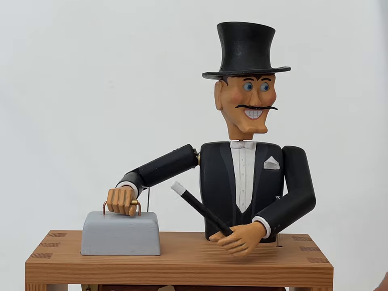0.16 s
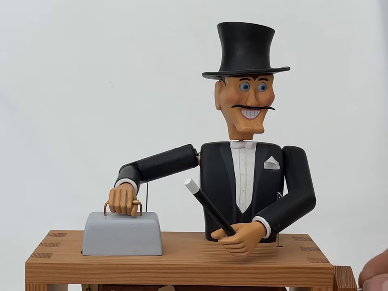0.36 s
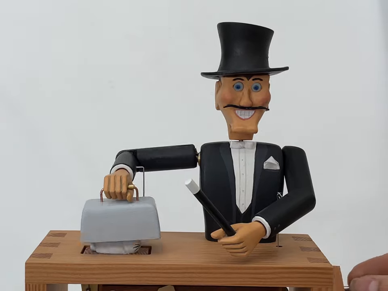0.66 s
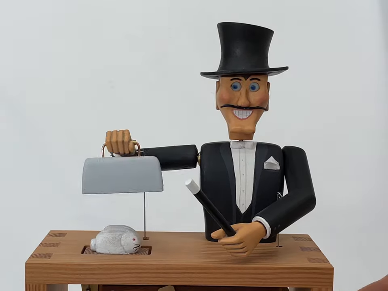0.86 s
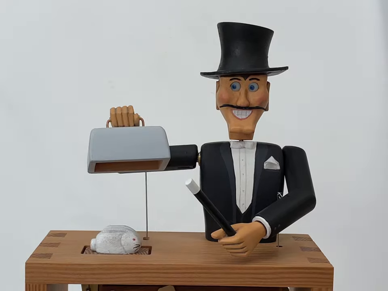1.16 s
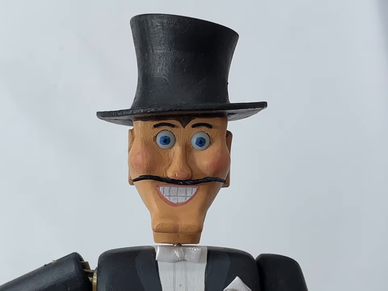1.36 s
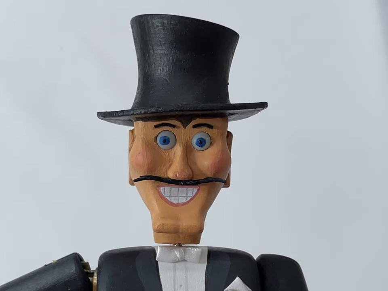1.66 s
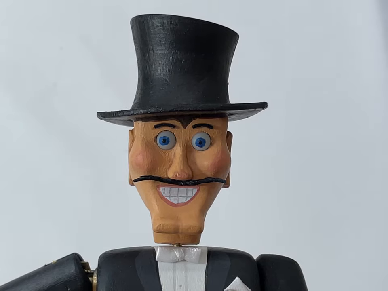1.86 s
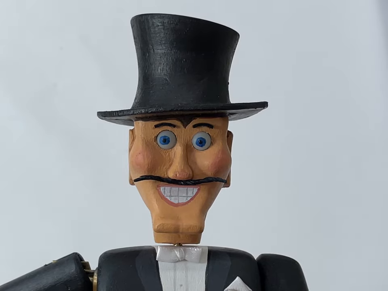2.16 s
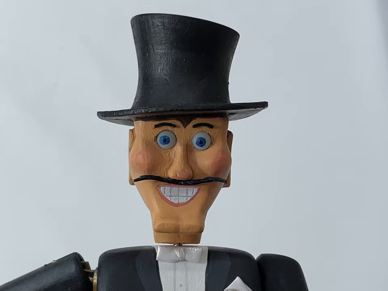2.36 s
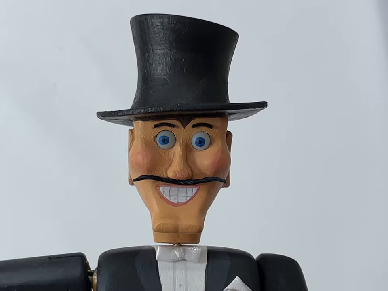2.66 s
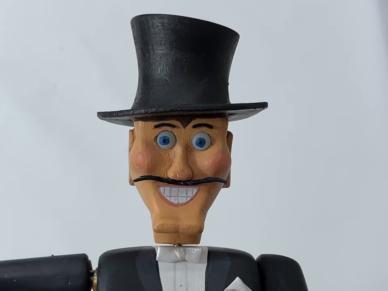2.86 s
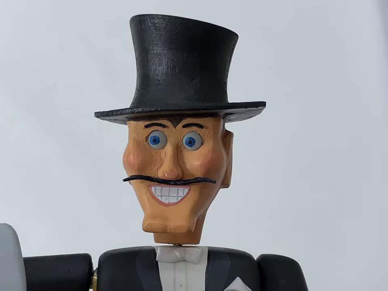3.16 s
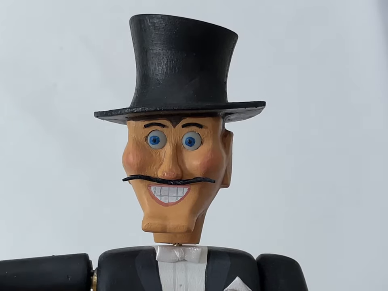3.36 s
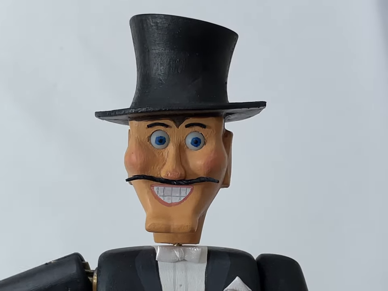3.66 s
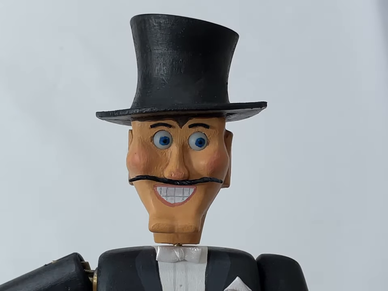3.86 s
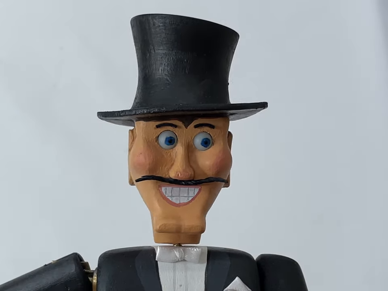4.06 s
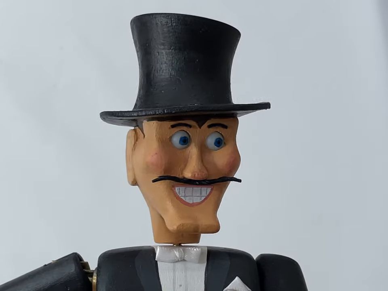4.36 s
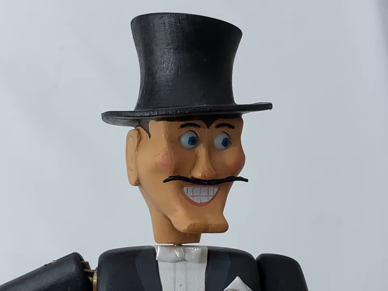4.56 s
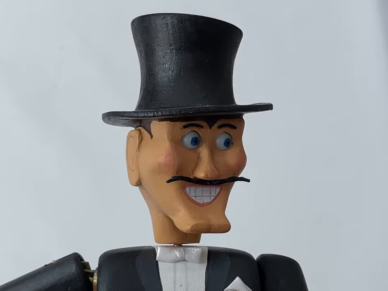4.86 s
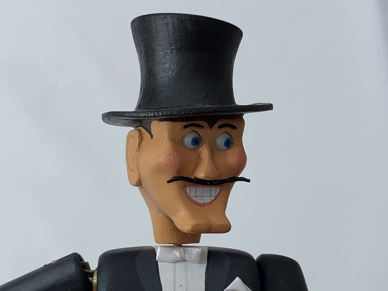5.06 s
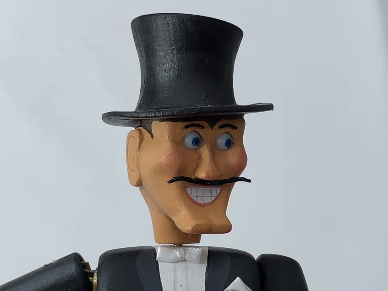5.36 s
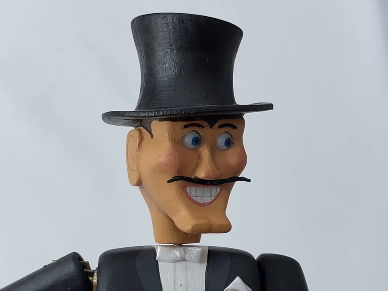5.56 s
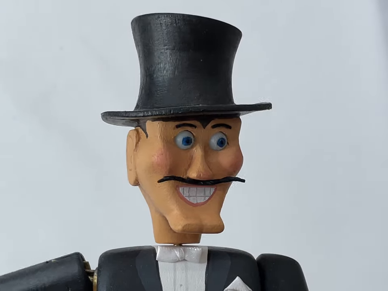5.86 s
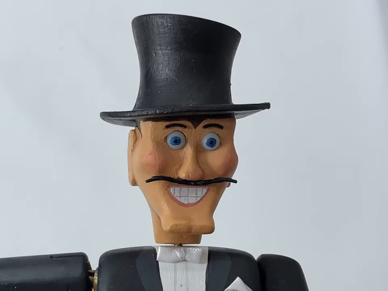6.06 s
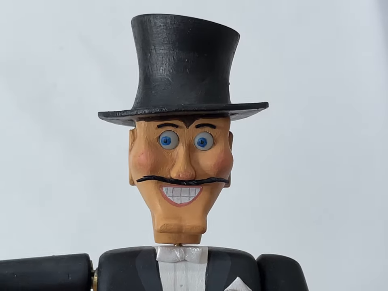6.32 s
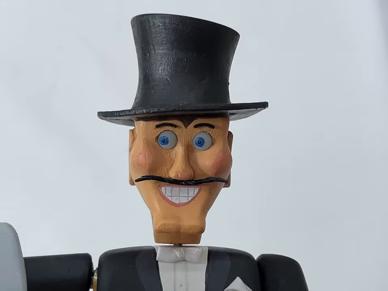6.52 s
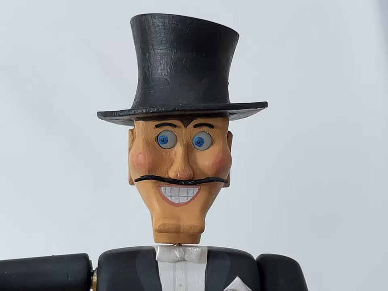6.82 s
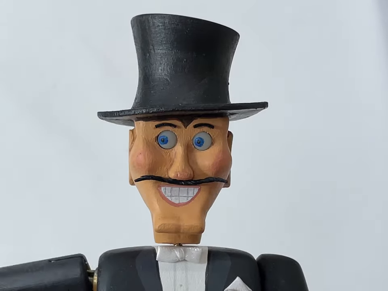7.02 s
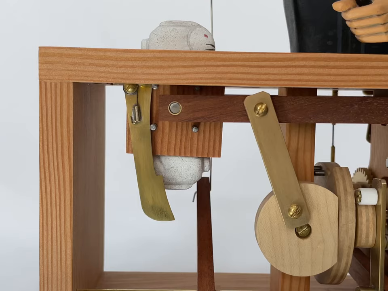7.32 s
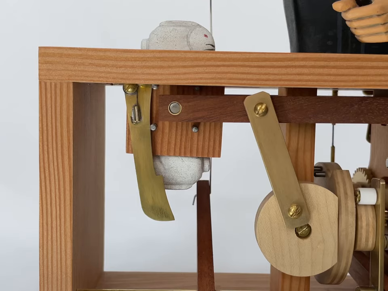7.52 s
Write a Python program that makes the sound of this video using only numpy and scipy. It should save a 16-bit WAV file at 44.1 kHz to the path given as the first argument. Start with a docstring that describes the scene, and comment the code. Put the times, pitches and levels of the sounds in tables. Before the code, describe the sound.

A hand-cranked wooden mechanism clicks and clatters in uneven runs, with a few sharp clacks, in a quiet room.

```python
"""A hand-cranked wooden toy knocks and chatters on a table in a quiet room. Its gear teeth, cams and levers hit
each other and make the wooden frame ring. Brass links chime faintly, shafts rub and groan, and the table thumps
along. The room adds a thin echo and a low rumble. Near the end the clatter and its echo break off at once, and
a few soft knocks follow."""
import sys
import numpy as np
from scipy import signal
from scipy.fft import rfft, irfft
from scipy.io import wavfile
from scipy.ndimage import uniform_filter1d

SR = 44100
rng = np.random.default_rng(int(sys.argv[2]) if len(sys.argv) > 2 else 0)


def log_audio(samples):
    """Write samples as a 16-bit WAV file to the path given in sys.argv[1]."""
    # one column per channel
    frames = np.atleast_2d(samples).T
    # limit to full scale, then quantise
    limited = np.clip(frames, -1, 1)
    pcm = np.round(limited * 32767).astype(np.int16)
    wavfile.write(sys.argv[1], SR, pcm)


N = 339120
STOP_S = 7.262

# The frame's tones in four groups (hollow, box, boards, sharp edge): pitch_hz, level_db, ring_s
FRAME_TONES = [
    [(2006.4, -1, 0.025), (2122, 3, 0.018), (2190, -9.5, 0.019), (2268, 6.5, 0.012), (2333, -3, 0.0095)],
    [(242, -28.5, 0.088), (562, -11, 0.034), (675, -16, 0.046), (937, -5, 0.017), (1179, 2, 0.015),
     (1494, 6, 0.015)],
    [(2899, 2.5, 0.0083), (3346, 2, 0.009), (3696, 4.5, 0.0065), (4320, 2, 0.0062), (4845, -3.5, 0.0063),
     (5415, -5.5, 0.011), (5995, -9.5, 0.015), (6610, -15, 0.01)],
    [(7900, -2.5, 0.0024), (9270, 2.5, 0.0017), (11300, -1, 0.0012), (13400, -8.5, 0.0014),
     (14810, -8, 0.003), (15700, -14, 0.002)],
]
# The range that each group sends into the air: low_hz, high_hz
FRAME_BANDS = [(1754, 3000), (154, 1930), (2270, 14900), (5600, 14000)]
# Wood hitting wood: start_s, peak_db, boards_db, sharpness_db, box_db, chatter_ms
KNOCKS = [(0.005, -35.5, -3.5, -6.5, -2, 8.4), (0.132, -32, 4.5, 9, -6, 8.7),
          (0.2109, -43, -4, -12.5, -4, 7.1), (0.229, -38.5, 3, 14, -3, 15), (0.246, -40.5, 8, 18, -4, 5.5),
          (0.3275, -45.5, 2.5, 0, 0, 5.3), (0.42, -48.5, 6, 1, 8, 10), (0.453, -49, 3, -6, 4, 8.5),
          (0.527, -46.5, 5, 1, 9, 6.1), (0.557, -42.5, 5.5, -18, 7, 8.6), (0.639, -48.5, -9, -21, 8.5, 9.8),
          (0.7651, -49.5, -3, -21, 6, 6.2), (0.861, -45, 6, -1.5, 6.5, 4.9),
          (0.8939, -49.5, -4, -18, 10.5, 6.9), (1.011, -41, -0.5, -26, 1.5, 11),
          (1.126, -39, -6, -6, -5, 3.3), (1.226, -40.5, -7, -9, 1, 4.9), (1.295, -49, 4, -1, -1, 9.3),
          (1.3063, -40.5, -2, 1, 7, 7.9), (1.3256, -25.5, 5, -0.5, -25, 4.4),
          (1.3846, -41, 12, 8, -16, 3.7), (1.394, -45, 14, -4, -14, 2.3), (1.416, -34, -2.5, -6.5, 0.5, 8),
          (1.436, -40, 3, 7.5, 3, 4.5), (1.508, -39.5, 3, -15, 7.5, 7.8), (1.5866, -48.5, 4, -9, -4, 3.7),
          (1.619, -37, -3, -14, 0, 8.2), (1.722, -33.5, 3.5, -19, 4, 6.6), (1.735, -36.5, 10, -11, 7, 1.7),
          (1.791, -41, 17, 8, 12, 5.6), (1.814, -31, -4, -15, 5, 6), (1.85, -19, 7.5, 7.5, -2.5, 7.7),
          (1.889, -29, 17, 15, 1, 4.2), (1.9067, -22, 4.5, 4.5, -12, 4.2), (1.926, -26.5, 4, 0.5, -10, 2.4),
          (1.942, -33.5, 2, -9, 5, 5.4), (2.0799, -34, 6.5, -1, 8, 3.7),
          (2.1895, -36.5, -4, -15, -0.5, 3.5), (2.273, -27, 0, -3, -3, 7.5), (2.28, -23.5, 2, -4, -3, 7.3),
          (2.406, -21.5, 9.5, 10.5, -1, 5.6), (2.432, -34.5, 7, 14, -1, 13), (2.447, -38.5, 1, 20, -4, 5.4),
          (2.488, -30, -12, -3, -5, 5.9), (2.57, -31.5, 0, -1.5, -7, 5.4), (2.625, -41, 9, 4, 12, 5.1),
          (2.635, -41, 14, 4, 6, 5.8), (2.659, -31.5, -6, -10, -8, 4.8), (2.689, -41, 1, -10, 7, 6.8),
          (2.7469, -36.5, -6, -22, 1.5, 6.2), (2.846, -33, -5, -27, 4, 5.7),
          (2.9478, -31, -13, -18, 4.5, 5.5), (2.964, -27.5, 14.5, -17, 12.5, 2.1),
          (3.023, -32.5, 5, -16, 5.5, 6.3), (3.069, -18.5, 6.5, 2, 1.5, 5.4),
          (3.1164, -30.5, -2, 4.5, -1.5, 7), (3.1942, -29, -3, -7, -4, 1.1), (3.239, -15.5, -1, 2.5, 2, 7),
          (3.3, -30.5, -17, -14, -5, 4.6), (3.362, -41, 18, 10, -1, 12), (3.382, -31.5, 12, 12, 6, 5.1),
          (3.3953, -30, 12.5, 19.5, 2, 2.4), (3.442, -30, 4, -14, 3, 7.1), (3.451, -4.5, 2.5, -6, -1, 4.25),
          (3.4556, -4.5, 18, 9, 9.5, 5.8), (3.47, -23, 6, -9, 24, 4.5), (3.646, -22, 1, 10, -0.5, 1.8),
          (3.69, -35.5, -10, -7, 4, 2.2), (3.7288, -35, -1.5, -15, 4, 6.4),
          (3.7866, -26, 4.5, 5.5, -1, 5.7), (3.847, -37.5, -2, -11, -1, 4.6), (3.9, -44, -2, -18, 11, 7.2),
          (3.956, -35, 3.5, 14, -16, 7.4), (4.001, -32, -4, 1, -2.5, 14), (4.07, -11, -13, -3.5, -28, 2.4),
          (4.078, -25, 4.5, 7, -3.5, 6.3), (4.09, -27, -2, 5, -10, 4.1), (4.097, -30, -5, 1, -6, 8.7),
          (4.12, -31, 9, 4, -7, 5.4), (4.138, -30.5, -9, -15, -13, 2.9), (4.184, -39, -5, -14, -14, 4.2),
          (4.192, -34.5, -4, -15, 4, 10), (4.2108, -40, -4, -18, -14, 2.3),
          (4.249, -24, 6.5, -16, -14, 2.1), (4.2627, -10.5, 16, -0.5, -1.5, 2.4),
          (4.273, -24.5, 12, 19, 15.5, 3.9), (4.287, -30, -7, -13, -5, 5.1), (4.3526, -21, 2, 2, -28, 1.7),
          (4.379, -29.5, 11, 13, 6, 10), (4.4049, -21.5, 8, -1.5, -9, 8.5), (4.418, -28, 0, -7, -9, 3.3),
          (4.4434, -17, 13.5, 8.5, 2, 7.8), (4.466, -13.5, 4.5, 4, -8, 2.8),
          (4.496, -19.5, 9.5, 13.5, -12, 8.4), (4.5217, -24.5, 3, -0.5, -5, 8.1),
          (4.5369, -30.5, 4, 7.5, 2, 5.3), (4.5706, -40, 4, 4, -6, 3.2), (4.637, -39, 2, -7.5, 11.5, 3.6),
          (4.736, -35, -4.5, -4.5, 3, 10.7), (4.759, -39, 4, 5, -11, 3.7), (4.783, -27, 7, -1.5, -18, 3.6),
          (4.823, -37.5, 6, -1, 6.5, 11.6), (4.915, -35, 5, 0, 7.5, 7.3), (4.9266, -40, 9, -3, 4, 3.5),
          (4.934, -39.5, -6, -6, -10, 4.8), (4.951, -44, 8, 2, -5.5, 6), (5.01, -35, -1, -24, 4.5, 9.4),
          (5.0235, -40, 1, -16, 0, 5.7), (5.099, -46, 13.5, -2, 1, 6.8),
          (5.1259, -37.5, 7.5, -5, 12.5, 3.4), (5.149, -22.5, 4.5, 5.5, -4, 8.9),
          (5.1915, -32, 9, 8, -6, 5), (5.2111, -22, 1.5, 1, -10, 4.6), (5.225, -37, 1, -9.5, 4, 4.5),
          (5.233, -28.5, 1, -2, -11.5, 4.7), (5.2429, -32.5, -9, -18, -3, 1.9),
          (5.373, -36.5, 2, 6.5, 3, 7.5), (5.388, -44, 13, 20.5, 10, 5.4), (5.422, -42.5, -5, 5.5, -2, 6.5),
          (5.4317, -35.5, 5.5, 12, 1.5, 9), (5.504, -42.5, -5, -18, 4, 8.6),
          (5.611, -31, -3.5, -12.5, -0.5, 4.7), (5.618, -34, -3, -15, 0.5, 4),
          (5.6837, -30.5, 13, 12.5, 5, 3.65), (5.749, -31.5, -4, 1, -4.5, 8.6),
          (5.7637, -35, 4.5, 16, 0, 14), (5.796, -43.5, 7.5, 13, -2, 11), (5.8248, -34, -5.5, 2, -10, 4.8),
          (5.904, -33, -16, -21, -0.5, 8.3), (5.9665, -38.5, 10.5, 6, -10.5, 7.4),
          (5.9926, -39, 12, 9.5, -16, 3.7), (6.0, -34, 1.5, -2.5, -2, 7.1),
          (6.021, -43, 7.5, -2, -0.5, 6.3), (6.034, -27.5, 0, -14, -2.5, 3.9),
          (6.0945, -41.5, -2, -15.5, 11, 7.5), (6.145, -40.5, 3.5, 13, -2, 6.8),
          (6.223, -44.5, 0, -15.5, 2.5, 2.3), (6.327, -35.5, 5.5, 4, 11.5, 5.1),
          (6.354, -32.5, -6.5, -19.5, 0, 4.8), (6.456, -36.5, 1, -21, -1, 1.9),
          (6.5574, -34, -5, -9.5, -4, 4.8), (6.642, -31, -5.5, -4.5, -3.5, 2.3),
          (6.737, -40, 0.5, 2.5, 6.5, 4.8), (6.769, -14, 2.5, 4.5, -2, 6.8),
          (6.787, -28.5, 22, 29, 16, 2.4), (6.797, -38, 12, 14, 6, 5.8), (6.8662, -33, 0.5, 4, 6, 6.2),
          (6.9245, -34.5, 6, 12, 15.5, 10), (6.945, -37.5, 3, 9.5, 13, 11), (6.956, -4, 5.5, 2.5, 2, 8.15),
          (6.978, -45, 6, 0, 11.5, 7.3), (7.1668, -19.5, -7, 4, -3, 7.4), (7.228, -35, 0.5, -9, 1.5, 7.3),
          (7.5663, -43.5, 16.5, 15, 1, 8.2), (7.622, -45, 20.5, 18, 2, 7.8), (7.653, -51, 24, 9.5, 9, 3.9),
          (7.683, -46.5, 17.5, 15.5, 6, 4.7)]
def knocks(size=4096):
    """Each knock is a burst of tiny hits that rings the frame; sharper knocks favour higher tones."""
    start_s, peak_db, boards_db, sharpness_db, box_db, chatter_ms = np.transpose(KNOCKS)
    focus_hz = 3794 * 2 ** (0.39 * sharpness_db + 0.2 * rng.standard_normal(len(KNOCKS)))
    group_db = [np.full(len(KNOCKS), 3.5), box_db - 11.5, boards_db - 2.5, sharpness_db - 11.5]
    drop_db_per_octave = [4.5, -4, 4, 2.5]  # away from the focus; the box gains instead
    t_ms = np.arange(size // 4) / SR * 1000
    span_ms = np.clip(chatter_ms - 2.2, .5, 20)[:, None]
    shape = (len(KNOCKS), len(t_ms))
    hits = rng.standard_normal(shape) * gain(1.3 * rng.exponential(size=shape))
    rise = np.minimum(t_ms / (0.062 * span_ms + 0.58), 1) ** 2
    fall = np.exp(-(t_ms / (span_ms + 1.5)) ** 3)
    push = rfft(hits * rise * fall, size)
    blows = 0
    for tones, band, db, drop in zip(FRAME_TONES, FRAME_BANDS, group_db, drop_db_per_octave):
        octaves_away = np.abs(np.log2(np.array(tones)[:, 0] / focus_hz[:, None]))
        weights = gain(2 * rng.standard_normal(octaves_away.shape) - drop * octaves_away)
        weights *= rng.choice([-1, 1], weights.shape)
        ringing = irfft(push * (weights @ rfft(frame_ring(tones, band, size))), size)
        blows = blows + set_peaks(ringing, db)
    return place(set_peaks(blows, peak_db), start_s - .0004)


def frame_ring(tones, band_hz, size):
    """One group of frame tones rings, filtered to the range it sends into the air."""
    return signal.sosfilt(signal.butter(3, band_hz, "band", fs=SR, output="sos"), rings(tones, size))


def shaking(t, strength_db, fade_s, step=64):
    """Each knock adds shaking that dies away; the stop ends it all."""
    age_s = t[::step, None] - np.transpose(KNOCKS)[0]
    fades = np.where(age_s > 0, np.exp(-2 * np.log(1000) * np.abs(age_s) / fade_s), 0)
    power = fades @ gain(2 * strength_db)
    return np.interp(t, t[::step], np.sqrt(power)) * (t < STOP_S)


# The tones of a brass link: pitch_hz, level_db, ring_s
BRASS_TONES = [(880, -18, 0.8), (1184, -22, 0.2), (1820, -17.5, 0.13), (2067, -7, 0.6), (2466, 3.5, 0.38),
               (2842, -19.5, 0.15), (3180, -8, 0.5), (3526, -22, 0.4), (4107, -22, 0.5), (4457, -10, 0.6),
               (4770, -14.5, 0.4), (4830, -9, 0.2), (5389, -24.5, 0.4), (6400, -7, 0.1)]
# Taps on the links: start_s, level_db, ring_fraction
CHIMES = [(0.233, -58, 0.57), (3.956, -50.5, 1), (4.003, -58.5, 1), (5.765, -53.5, 0.23),
          (7.565, -56.5, 0.15), (7.624, -63.5, 0.38)]
def chimes(size=16384):
    """Brass links ring after a light tap; anything touching them shortens the ring."""
    mixes = gain(0.61 * rng.standard_normal((len(CHIMES), len(BRASS_TONES))))
    sounds = [gain(db) * mix @ rings(BRASS_TONES, size, ring_fraction)
              for (_, db, ring_fraction), mix in zip(CHIMES, mixes)]
    return place(sounds, np.transpose(CHIMES)[0])


# A lever sliding over a cam: start_s, length_s, level_db
SCRAPES = [(0.219, 0.073, -65), (2.438, 0.051, -56), (3.369, 0.07, -53.5), (4.098, 0.021, -51),
           (5.764, 0.045, -56.5), (6.905, 0.032, -55.5)]
def scrape_strength(t, edge_s=0.006):
    """A lever presses on a cam briefly, fading quickly in and out."""
    return sum(gain(db) * np.clip(np.minimum(t - start, start + length - t) / edge_s, 0, 1)
               for start, length, db in SCRAPES)


# How hard the shafts and cams rub: time_s, level_db
RUBBING = [(0.0, -64), (0.15, -74.5), (0.45, -62), (0.65, -72.5), (1.27, -76.5), (1.31, -69.5), (1.75, -63),
           (2.1, -74), (2.6, -59), (2.8, -72), (3.8, -72), (4.05, -66.5), (4.55, -53.5), (4.72, -74),
           (4.87, -58.5), (5.05, -69), (5.6, -72), (5.78, -59.5), (6.0, -64), (6.13, -72), (7.25, -73.5),
           (7.275, -84.5), (7.69, -79)]
# Tones that rubbing wakes in the hollow and boards: pitch_hz, width_hz, level_db
RUB_TONES = [(2090, 120, -3), (2255, 130, -6), (3520, 130, -15)]
def rubbing(t):
    """Many tiny slips shake the frame as shafts turn, loose parts chafe and levers scrape."""
    slips = rng.standard_normal(N) * gain(2.5 * rng.exponential(size=N) + flicker(60))
    slips = signal.sosfilt(signal.butter(4, 11300, fs=SR, output="sos"), slips)  # softer than a knock
    responses = [frame_ring(tones, band, 2048).sum(axis=0) for tones, band in zip(FRAME_TONES, FRAME_BANDS)]
    groups = np.array([set_level(signal.fftconvolve(slips, ring)[:N], 0) for ring in responses])
    shafts = gain(curve(RUBBING, t))
    loose_parts = shaking(t, np.transpose(KNOCKS)[1], fade_s=0.42)
    # Each cause drives the four frame groups by its own amounts.
    causes = [(shafts, [-9, -21, -13, -30]),
              (loose_parts, [-36, -46, -36.5, -49.5]),
              (scrape_strength(t), [-3, -22.5, -0.5, -6])]
    power = sum((strength * gain(group_db)[:, None]) ** 2 for strength, group_db in causes)
    singing = shafts * ringing_noise(RUB_TONES) * gain(2 * flicker(40))
    return np.sum(np.sqrt(power) * groups, axis=0) + singing


# The tones of a sticking shaft: pitch_hz, width_hz, level_db
GROAN_TONES = [(225, 22, -6.5), (500, 25, 2.5), (640, 23, -9)]
# How its groan swells and fades: time_s, level_db
GROAN_SWELL = [(6.19, -100), (6.22, -83), (6.35, -67), (6.5, -70), (6.55, -100)]
def groan(t):
    """A shaft sticks in its bearing and gives one low groan."""
    return ringing_noise(GROAN_TONES) * gain(curve(GROAN_SWELL, t))


# The low tones of the table: pitch_hz, width_hz, level_db
TABLE_TONES = [(70.6, 33, -6), (124.6, 99, -3.5), (255, 170, -3.5)]
# Bumping carried by the table: time_s, level_db
BUMPS = [(0.0, -73), (0.3, -80.5), (0.8, -72), (1.4, -82.5), (1.75, -71.5), (2.1, -80), (2.3, -72),
         (2.85, -84), (3.4, -70), (3.65, -71), (3.87, -86), (4.12, -71), (4.65, -85), (4.9, -72),
         (5.3, -84), (6.1, -84), (6.45, -75.5), (6.9, -73.5), (7.69, -79)]
def table_bumps(t):
    """The table rumbles under the toy and thumps with each knock, more for heavy ones."""
    _, peak_db, _, _, box_db, _ = np.transpose(KNOCKS)
    thumps = shaking(t, -58 + 0.45 * (peak_db + box_db), fade_s=0.28)
    low_band = signal.butter(2, [45, 350], "band", fs=SR, output="sos")
    rumble = set_level(signal.sosfilt(low_band, ringing_noise(TABLE_TONES)), 0)
    bumps = gain(curve(BUMPS, t) + 1.2 * flicker(25))
    return rumble * np.hypot(bumps, thumps)


# How long the room echoes: pitch_hz, ring_s
ECHO_TIMES = [(150, 0.88), (2200, 0.35), (5000, 0.26), (10000, 0.75), (16000, 0.54)]
# Stereo width, the side signal against the middle: pitch_hz, side_db
ROOM_WIDTH = [(30, -17), (200, -5.5), (700, -7), (1400, -2.5), (2300, -11), (3000, -35), (14000, -32.5)]
def room_echo(sound, size=32768, rise_s=0.0051, echo_db=-16.5):
    """The walls return a soft echo in which each octave fades at its own speed."""
    t, hz = np.arange(size) / SR, np.fft.rfftfreq(size, 1 / SR)
    noise = rfft(rng.standard_normal((2, size)))
    tail = 0
    for centre_hz in 62.5 * 2. ** np.arange(9):
        octave = np.clip(1 - np.abs(np.log2((hz + 1) / centre_hz)), 0, 1)
        tail = tail + irfft(noise * octave, size) * fade(t, pitch_curve(ECHO_TIMES, centre_hz))
    tail *= np.clip(t / rise_s - .5, 0, 1)
    tail[1] = irfft(rfft(tail[1]) * gain(pitch_curve(ROOM_WIDTH, hz)), size)
    tail *= gain(echo_db) / np.sqrt(np.sum(tail[0] ** 2))
    return stereo(*signal.fftconvolve(sound[None], tail, axes=1)[:, :N])


# The background noise of the room: pitch_hz, level_db
HUSH = [(15, -45.5), (30, -18.5), (55, -8), (110, -5.5), (300, -15), (800, -15.5), (2200, -35), (4000, -31),
        (6000, -38.5), (8500, -36.5), (13000, -42), (14500, -66)]
def room_hush():
    """The still room has a low rumble and a faint hiss."""
    hz = np.fft.rfftfreq(N, 1 / SR)
    middle, side = rfft(rng.standard_normal((2, N))) * gain(pitch_curve(HUSH, hz))
    noise = irfft(stereo(middle, side * gain(pitch_curve(ROOM_WIDTH, hz))), N)
    return set_level(noise, -79) * gain(1.3 * flicker(14))


def gain(db):
    """Turn decibels into a multiplier."""
    return 10 ** (np.asarray(db) / 20)


def set_level(sound, db):
    """Set the average (rms) level."""
    return sound * gain(db) / np.sqrt(np.mean(sound ** 2))


def set_peaks(sounds, db):
    """Give each sound its own peak level."""
    return sounds / np.abs(sounds).max(axis=1, keepdims=True) * gain(db)[:, None]


def curve(table, x):
    """Read between the rows of a table."""
    return np.interp(x, *np.transpose(table))


def pitch_curve(table, hz):
    """Read between rows, spacing pitches by octaves."""
    pitches, values = np.transpose(table)
    return np.interp(np.log(hz + 1), np.log(pitches + 1), values)


def fade(t, ring_s):
    """Fall by 60 dB in ring_s."""
    return np.exp(-np.log(1000) * t / ring_s)


def rings(tones, size, ring_fraction=1):
    """One fading sine wave for each tone."""
    t = np.arange(size) / SR
    return np.array([gain(db) * np.sin(2 * np.pi * hz * t) * fade(t, ring_s * ring_fraction)
                     for hz, db, ring_s in tones])


def ringing_noise(tones):
    """Noise filtered to ring around each tone."""
    noise = rng.standard_normal(N)
    return sum(set_level(signal.lfilter(*signal.iirpeak(hz, hz / width, SR), noise), db)
               for hz, width, db in tones)


def flicker(rate_hz):
    """Glide between random values."""
    hold = int(SR / rate_hz)
    return 2.6 * uniform_filter1d(np.repeat(rng.standard_normal(N // hold + 1), hold), hold)[:N]


def place(sounds, starts_s):
    """Lay each sound at its start time."""
    track = np.zeros(N)
    for sound, start_s in zip(sounds, starts_s):
        i = int(start_s * SR)
        track[i:i + len(sound)] += sound[:N - i]
    return track


def stereo(middle, side):
    """Make the left and right channels."""
    return np.array([middle + side, middle - side])


def scene():
    """The toy plays in the room; its echo is cut at the stop, then starts afresh."""
    t = np.arange(N) / SR
    toy = knocks() + chimes() + rubbing(t) + groan(t) + table_bumps(t)
    before_stop = np.clip((STOP_S - t) / .002, 0, 1)
    echo = room_echo(toy * before_stop) * before_stop + room_echo(toy * (1 - before_stop))
    return toy + echo + room_hush()


# How much louder the left microphone is: pitch_hz, level_db
LEFT_LOUDER = [(100, 0.2), (400, 1.2), (700, 2), (1200, 7), (1550, 4), (1750, -2), (2000, 3.7), (2500, 2.2),
               (3000, .3), (3500, 0)]
# How far ahead its wave is: pitch_hz, phase_radians
LEFT_AHEAD = [(0, 0), (700, .35), (1200, .15), (1450, -.6), (1680, -.6), (1760, .3), (2050, 0),
              (5800, -.03), (6900, -.9), (8150, -3.14), (10700, -6.1), (12200, -6.5), (13800, -9.2),
              (16500, -9.6)]
def record(dry, top_hz=16300):
    """A phone's two microphones hear each pitch unequally and lose the highest treble."""
    hz = np.fft.rfftfreq(N, 1 / SR)
    left = gain(pitch_curve(LEFT_LOUDER, hz) / 2) * np.exp(.5j * curve(LEFT_AHEAD, hz))
    heard = irfft(rfft(dry) * np.array([left, 1 / left]), N)
    return signal.sosfilt(signal.ellip(10, .2, 70, top_hz, fs=SR, output="sos"), heard)


dry = scene()
out = record(dry)
log_audio(out)
```